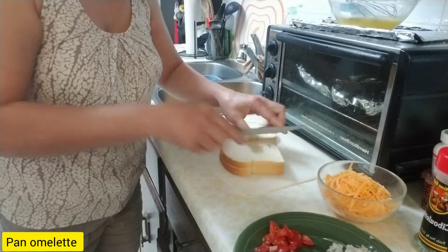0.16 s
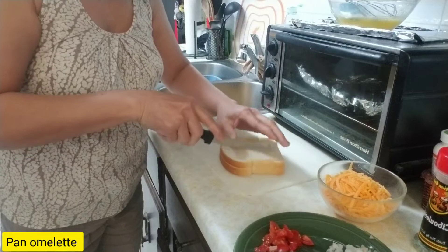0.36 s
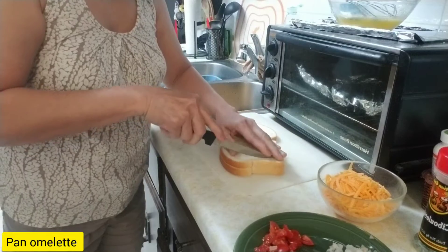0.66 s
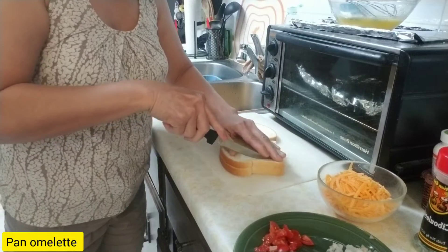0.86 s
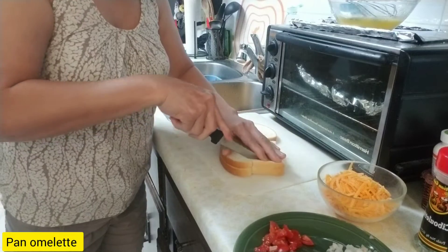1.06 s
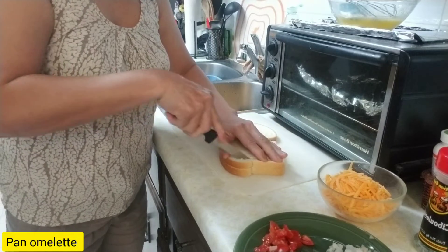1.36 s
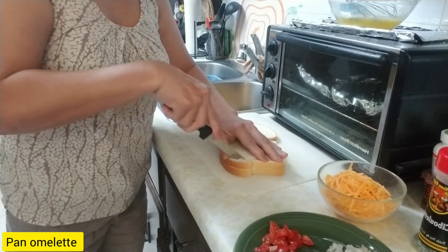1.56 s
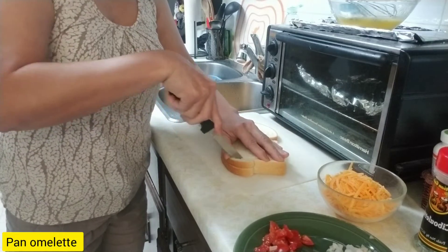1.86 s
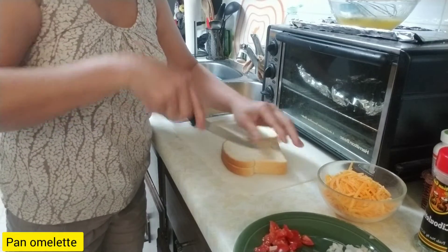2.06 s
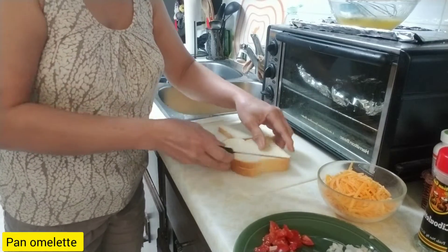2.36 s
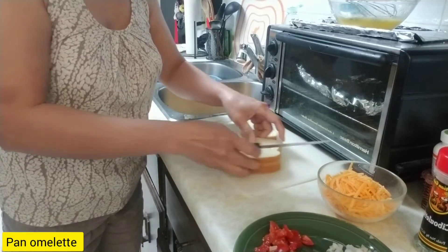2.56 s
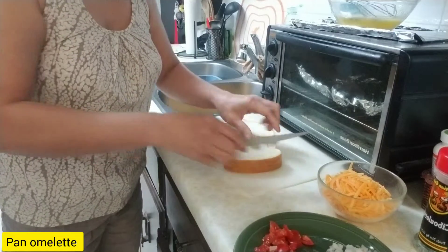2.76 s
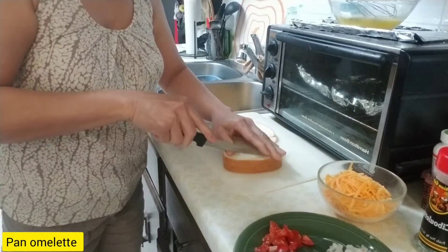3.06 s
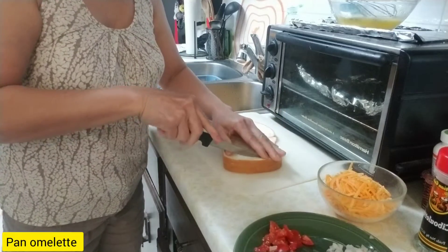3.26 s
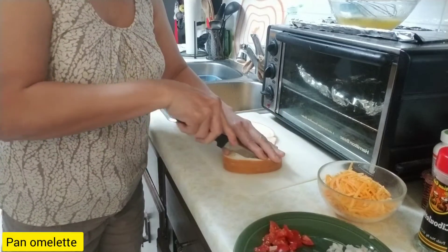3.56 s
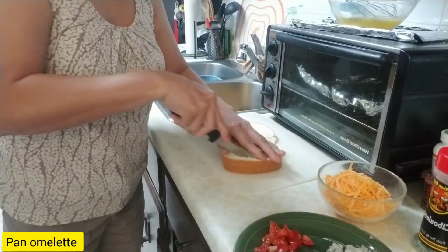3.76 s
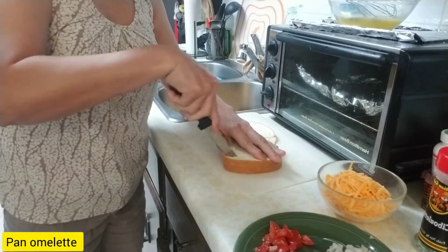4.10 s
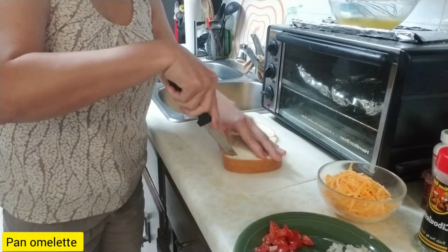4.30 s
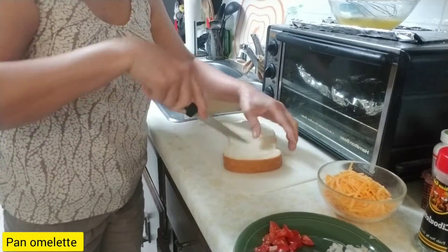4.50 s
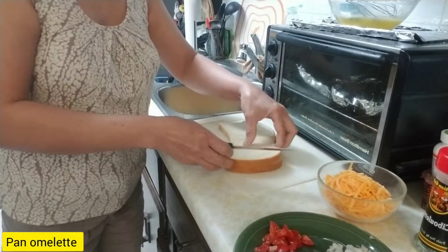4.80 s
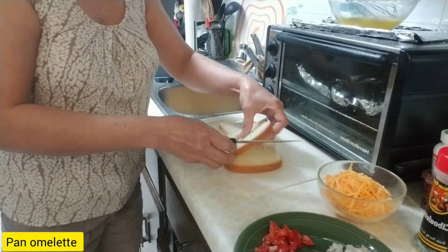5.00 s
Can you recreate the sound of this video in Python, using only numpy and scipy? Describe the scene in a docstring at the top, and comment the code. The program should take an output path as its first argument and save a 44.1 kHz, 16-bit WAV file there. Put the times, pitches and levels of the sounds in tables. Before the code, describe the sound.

A steady, slightly wavering appliance hum and a low rush of air fill a small kitchen throughout, with a faint high microphone hiss. At first nothing else is heard. From about 1.4 to 1.9 seconds a knife is pulled through a slice of bread in quick short strokes: dry scrapes with fine crumb crackles and dull knocks on the countertop as the edge catches and lets go, loudest around 1.7 seconds. A hand thumps the counter softly under these strokes and again near 2.2 seconds. From 2.3 to 2.7 seconds fingers and blade rub and rustle quietly as the slice is turned. A second, slightly brighter bout of cutting runs from 3.7 to 4.1 seconds, with sharp knocks near 3.9 and 4.05. One light brush and tap comes at about 4.6 seconds, then only the hum remains. The knife sounds have short, tight room reflections.

```python
"""A kitchen knife is pulled through a slice of bread in two bouts of short strokes.
Stick-slip friction at its edge drives the countertop's resonant modes, tearing crumb crackles,
and snags release as knocks. The hand's weight thumps the counter, and fingers and blade brush
the slice as it is turned. The small kitchen reflects the knife's sound; throughout, an appliance
hums over a low rush of air and the microphone adds a faint high hiss."""
import sys
import numpy as np
from scipy import signal
from scipy.fft import rfft, irfft, next_fast_len
from scipy.io import wavfile
from scipy.ndimage import map_coordinates

SR = 44100
rng = np.random.default_rng(int(sys.argv[2]) if len(sys.argv) > 2 else 0)


def dump_mix(stems):
    """Bounce the given channels to the path in sys.argv[1] as a 16-bit WAV at rate SR."""
    frames = np.atleast_2d(stems).T  # one column per channel
    limited = np.clip(frames, -1, 1)  # hard clip at full scale
    pcm = np.round(limited * 32767).astype(np.int16)
    wavfile.write(sys.argv[1], SR, pcm)


N = 226718


def amp(db):
    """Decibels to amplitude ratio."""
    return 10 ** (np.asarray(db) / 20)


def unit(x):
    """Normalisation to rms 1."""
    return x / np.sqrt(np.mean(x ** 2) + 1e-20)


def along(points, hz):
    """Interpolation of (frequency_hz, value) points on a logarithmic frequency axis."""
    knots_hz, values = np.transpose(points)
    return np.interp(np.log(hz + 1), np.log(knots_hz + 1), values)


def wobble(rate_hz):
    """Smooth random modulation: a spline through Gaussian knots."""
    knots = rng.standard_normal(int(N * rate_hz / SR) + 4)
    return map_coordinates(knots, [np.arange(N) * rate_hz / SR])


def filtered(x, response):
    """Linear filtering: the spectrum of x times a frequency response."""
    n = x.shape[-1]
    size = next_fast_len(n + 8192)
    return irfft(rfft(x, size) * response(np.fft.rfftfreq(size, 1 / SR)), size)[..., :n]


def resonant(modes, hz):
    """Modal superposition: a direct path plus (centre_hz, width_hz, gain_db) resonances."""
    return 1 + sum(amp(db) * 1j * hz * width / (centre ** 2 - hz ** 2 + 1j * hz * width)
                   for centre, width, db in modes)


def add(track, start_s, x):
    """Superposition of x on the track from start_s on."""
    start = round(start_s * SR)
    part = x[max(-start, 0):max(N - start, 0)]
    track[max(start, 0):][:len(part)] += part


def panned(x, left_db):
    """Interchannel level difference: left lies left_db above right."""
    return x * amp([[left_db / 2], [-left_db / 2]])


def correlated(pair, correlation):
    """Mid-side mixing gives two independent signals a set left-right correlation."""
    angle = lambda hz: np.arccos(np.clip(along(correlation, hz), -1, 1)) / 2
    mid, side = filtered(pair, lambda hz: np.array([np.cos(angle(hz)), np.sin(angle(hz))]))
    return np.array([mid + side, mid - side])


def stereo_noise(spectrum, correlation):
    """Spectral shaping of white noise, partly correlated between the sides, at rms 1."""
    coloured = filtered(rng.standard_normal((2, N)), lambda hz: amp(along(spectrum, hz)))
    return unit(correlated(coloured, correlation))


# Envelope of the hum's deepest tone: time_s, relative_level_db
DRONE_ENVELOPE = [(0.0, -51), (0.24, -51.5), (2.15, -47.5), (2.22, -54.5), (2.69, -45.5), (2.82, -71),
                  (2.89, -47), (3.11, -55), (3.19, -44.5), (3.56, -53), (3.79, -45), (3.84, -71),
                  (3.91, -43.5), (4.36, -56), (4.52, -48), (5.14, -54.5)]
# Higher tones of the hum: pitch_hz, level_db, waver_db
HUM_TONES = [(119.35, -54, 2), (193.4, -55, 1.5), (291.2, -59, 3), (350, -61, 3), (442.6, -67, 3)]
# Rush of the room's air and machinery: frequency_hz, relative_density_db
AIR_SPECTRUM = [(20, -21), (33, -19), (46, -1.5), (62, 2), (85, -9.5), (115, -2), (150, -5.5), (185, -0.5),
                (235, -5), (300, -6), (440, -4), (540, -13), (680, -21.5), (1050, -25.5), (1500, -34),
                (3000, -44), (8000, -72)]
# Left-right likeness of that rush: frequency_hz, correlation
AIR_CORRELATION = [(60, 0.9), (130, 0.89), (290, 0.66), (640, 0.37), (1400, 0), (3000, 0.035)]

def appliance(drone_hz=57.9):
    """Amplitude and phase modulation make motor and mains tones waver over a low rush of air."""
    t = np.arange(N) / SR
    tone = lambda hz, drift_rad: np.sin(2 * np.pi * hz * t + drift_rad * wobble(8))
    drone_db = np.interp(t, *np.transpose(DRONE_ENVELOPE)) - 0.5 + 1.7 * wobble(12)
    hum = amp(drone_db) * unit(tone(drone_hz, drift_rad=0.7))
    for pitch_hz, level_db, waver_db in HUM_TONES:
        waver = amp(waver_db * wobble(9))
        hum += amp(level_db) * unit(waver * tone(pitch_hz, drift_rad=0.85))
    air = amp(-49.5 + 0.13 * wobble(5.48)) * stereo_noise(AIR_SPECTRUM, AIR_CORRELATION)
    return panned(hum, left_db=-1) + panned(air, left_db=-0.5)


# Colour of the microphone's hiss: frequency_hz, relative_density_db
HISS_SPECTRUM = [(200, -9.5), (2000, -14), (5000, -10), (7000, -16.5), (9000, -21), (10300, -14),
                 (12000, -4.5), (14000, -2), (15700, -2)]
# Its left-right likeness: frequency_hz, correlation
HISS_CORRELATION = [(1000, 0.11), (6000, 0), (9000, 1), (13000, 0.98)]
# Its balance: frequency_hz, left_minus_right_db
HISS_PAN = [(3000, -3.5), (6000, -2), (8500, 0), (11000, 1.5), (13500, -6)]

def microphone_hiss():
    """Self-noise: a faint broadband floor whose level flickers slightly."""
    hiss = amp(-67.5 + 0.75 * wobble(41)) * stereo_noise(HISS_SPECTRUM, HISS_CORRELATION)
    return filtered(hiss, lambda hz: amp(np.outer([.5, -.5], along(HISS_PAN, hz))))


# How the countertop radiates a push: frequency_hz, gain_db
COUNTER_RADIATION = [(50, -12.5), (110, -11), (210, -4), (330, -1), (560, 0), (660, -2.5), (1000, 1),
                     (1170, -1), (1550, 2), (2200, -2.5), (3100, -6.5), (5500, -3), (8500, -2.5),
                     (14000, 6)]
# Its resonances: centre_hz, width_hz, gain_over_direct_db
COUNTER_MODES = [(336, 32, 0.5), (451, 27, -2.5), (486, 75, -4.5), (600, 36, -0.5), (840, 120, -7.5),
                 (944, 26, -11), (1085, 26, 4), (1267, 52, -3.5), (1335, 27, 0), (1666, 70, -3),
                 (1800, 71, -6.5), (2490, 190, -0.5), (3900, 340, -2)]

def counter_response(size=8192):
    """Impulse response of the countertop: a minimum-phase thud and the short ring of its modes."""
    hz = np.fft.rfftfreq(size, 1 / SR)
    cepstrum = irfft(np.log(amp(along(COUNTER_RADIATION, hz))))
    cepstrum[1:size // 2] *= 2  # folding onto positive time makes the thud causal
    cepstrum[size // 2 + 1:] = 0
    return irfft(np.exp(rfft(cepstrum)) * resonant(COUNTER_MODES, hz))[:size // 2]


def cushioned(knock, corner_hz, order=4):
    """Contact compliance: bread under the edge acts as a low-pass filter."""
    pole = np.exp(-2 * np.pi * corner_hz / SR)
    return signal.lfilter([1], np.poly([pole] * order), knock)


def slips(n, rate_hz, scatter_db):
    """A Poisson process of tiny releases with log-normal sizes and random signs."""
    occurs = rng.random(n) < rate_hz / SR
    sizes = amp(scatter_db * rng.standard_normal(n))
    return occurs * sizes * rng.choice([-1, 1], n)


FALL_SHARE = .85  # fall time over rise time: a drag lets go faster than it builds

def swell(grains, t, rise_s):
    """Amplitude envelope: pressure builds and lets go, with grains near rms 1 at its height."""
    half_span_s = np.where(t < 0, rise_s, FALL_SHARE * rise_s) / 2
    steepness = np.where(t < 0, 1.2, 1)
    pressure = np.exp(1 - np.hypot(1, t / half_span_s) ** steepness)
    shaped = grains * pressure
    return shaped * np.sqrt(np.sum(pressure ** 2) / (np.sum(shaped ** 2) + 1e-20))


# Shudder of the pressed counter: centre_hz, width_hz, gain_over_slips_db
SHUDDER_MODE = (345, 110, -2)
# Tearing crumb: frequency_hz, relative_density_db
CRUMB_SPECTRUM = [(300, -43), (1200, 8.5), (2500, 4.5), (3200, 1.5), (5000, 1), (6600, -3.5), (8500, -21.5),
                  (10500, -14), (13000, -11), (16000, -10)]
# Faint ring of the steel blade: centre_hz, width_hz, gain_over_crumb_db
BLADE_MODES = [(2650, 300, -6), (3930, 120, -1.5)]

def drags(rows, knock, slip_rate_hz, rasp_width_hz, rasp_db, tear_rate_hz, crumb_lag_s):
    """Stick-slip friction shakes the counter while cells of crumb fracture along the blade."""
    scrape, crumb = np.zeros(N), np.zeros(N)
    t = np.arange(-SR // 6, SR // 6) / SR
    for peak_s, rise_s, scrape_db, corner_hz, crumb_db in rows:
        rasp_hz = 0.568 * corner_hz  # both climb as the edge nears the counter
        rasp = (rasp_hz, rasp_width_hz, rasp_db)
        releases = slips(len(t), slip_rate_hz, scatter_db=2)
        chatter = signal.fftconvolve(releases, cushioned(knock, corner_hz))[:len(t)]
        chatter = filtered(chatter, lambda hz: resonant([SHUDDER_MODE], hz) * resonant([rasp], hz))
        tears = slips(len(t), tear_rate_hz, scatter_db=4)
        tearing = filtered(tears, lambda hz: amp(along(CRUMB_SPECTRUM, hz)) * resonant(BLADE_MODES, hz))
        add(scrape, peak_s + t[0], amp(scrape_db) * swell(chatter, t, rise_s))
        add(crumb, peak_s + t[0] + crumb_lag_s, amp(crumb_db) * swell(tearing, t, rise_s))
    return scrape, crumb


# Pulls of the blade: peak_s, rise_s, relative_scrape_db, corner_hz, relative_crumb_db
KNIFE_STROKES = [(1.345, 0.047, -64, 1800, -76), (1.456, .035, -40.5, 1050, -64),
                 (1.543, .031, -37, 1280, -62), (1.657, .033, -30.5, 1040, -59.5),
                 (1.724, .019, -27, 1650, -51.5), (1.823, 0.00788, -36, 600, -85),
                 (1.853, 0.033, -47, 920, -61.5), (3.7, 0.041, -42, 950, -65),
                 (3.8, 0.035, -39.5, 1030, -67), (3.905, .032, -29, 1800, -45.5),
                 (4.046, .012, -32, 2200, -49.5), (4.074, .026, -31, 2450, -54),
                 (4.275, .055, -57, 2200, -84)]

def cutting(knock):
    """Friction and fracture under the pulled edge give a scrape and a crackle."""
    scrape, crumb = drags(KNIFE_STROKES, knock, slip_rate_hz=1200, rasp_width_hz=240, rasp_db=-3,
                          tear_rate_hz=5000, crumb_lag_s=0.0027)
    return amp(-4) * scrape, amp(-4.5) * crumb


# The flat of the blade sliding on crumb: frequency_hz, relative_density_db
SLIDE_SPECTRUM = [(5000, -31), (9000, -19), (11000, -2.5), (13000, 2), (16000, -1.5)]

def sliding(base_db, growth, length_in_rises):
    """Sliding friction gives each stroke a fine hiss that grows slowly with the crumb's level."""
    t = np.arange(N) / SR
    envelope = np.zeros(N)
    for peak_s, rise_s, *_, crumb_db in KNIFE_STROKES:
        span_s = length_in_rises * rise_s * np.where(t < peak_s, 1, FALL_SHARE)
        envelope += amp(base_db + growth * crumb_db) / (1 + ((t - peak_s) / span_s) ** 4)
    return envelope * stereo_noise(SLIDE_SPECTRUM, correlation=[(10000, 1.0)])


def light_catches(count=3, over_scrape_db=2, scatter_db=1.2, reach_in_rises=.6):
    """Random sticking: every drag catches lightly at chance moments near its height."""
    rows = []
    for peak_s, rise_s, scrape_db, corner_hz, _ in KNIFE_STROKES + SLICE_TOUCHES:
        for _ in range(count):
            release_s = peak_s + reach_in_rises * rise_s * rng.uniform(-1, FALL_SHARE)
            peak_db = scrape_db + over_scrape_db + scatter_db * rng.standard_normal()
            rows.append((release_s, peak_db, corner_hz))
    return rows


# The edge catches hard and lets go: release_s, relative_peak_db
HARD_SNAGS = [(1.4497, -27.5), (1.526, -26), (1.54, -25), (1.6352, -23), (1.6538, -19.5), (1.7058, -18),
              (1.7117, -22), (1.7221, -14.5), (1.8188, -19), (3.872, -26.5), (3.8953, -16), (3.903, -19),
              (3.9118, -15), (4.031, -23.5), (4.0419, -15), (4.0493, -20.5), (4.072, -22.5), (4.6265, -38)]

def hard_catches(even_db=-16.5, db_per_octave=29):
    """Nonlinear contact: a snag above even_db bites deeper and is brighter than the nearest drag."""
    rows = []
    for release_s, peak_db in HARD_SNAGS:
        *_, corner_hz, _ = min(KNIFE_STROKES + SLICE_TOUCHES, key=lambda row: abs(row[0] - release_s))
        octaves = (peak_db - even_db) / db_per_octave
        rows.append((release_s, peak_db, corner_hz * 2 ** octaves))
    return rows


def snags(knock, load_s, load_share):
    """Elastic loading and release: the edge strains the counter, then jumps free and knocks it."""
    track = np.zeros(N)
    t = np.arange(-SR // 200, 1) / SR
    loading = np.exp(t / load_s)
    force = load_share * loading / loading.sum() - (t == 0)
    for release_s, peak_db, corner_hz in hard_catches() + light_catches():
        blow = cushioned(np.convolve(force, knock), corner_hz)
        add(track, release_s + t[0], amp(peak_db) * blow / np.abs(blow).max())
    return track


# Reverberation time of the kitchen: frequency_hz, t60_s
KITCHEN_DECAY = [(150, 0.18), (600, 0.27), (1300, 0.28), (6000, 0.18), (14000, 0.1)]
# Left-right likeness of its echoes: frequency_hz, correlation
ECHO_CORRELATION = [(150, 1), (300, 0.99), (550, 0.54), (1200, -0.35), (3000, -0.22)]

def echo_pattern(near_db, near_t60_s, far_db):
    """Early reflections off oven door and wall, and the room's diffuse tail, as decaying noise."""
    hz, t, spectra = signal.stft(rng.standard_normal((2, SR // 3)), SR, nperseg=256)
    decay = amp(-60 * t / along(KITCHEN_DECAY, hz)[:, None])
    far = signal.istft(spectra * decay, SR, nperseg=256)[1]
    age_s = np.arange(far.shape[1]) / SR
    near = rng.standard_normal(far.shape) * amp(-60 * age_s / near_t60_s)
    echoes = sum(amp(db) * x / np.linalg.norm(x[0]) for db, x in [(near_db, near), (far_db, far)])
    return correlated(echoes, ECHO_CORRELATION)


def kitchen(x, near_db, near_t60_s, far_db, delay_s=0.001139, steps=20):
    """Time-varying reverberation: echo patterns crossfade as hands and knife move."""
    hop = N // steps + 1
    delayed = np.pad(x, (hop + round(delay_s * SR), 2 * hop))
    fade = signal.get_window("hann", 2 * hop)
    wet = np.zeros((2, len(delayed) + SR))
    for start in range(0, N + hop, hop):
        segment = fade * delayed[None, start:start + 2 * hop]
        echoes = signal.fftconvolve(segment, echo_pattern(near_db, near_t60_s, far_db), axes=1)
        wet[:, start:start + echoes.shape[1]] += echoes
    return wet[:, hop:hop + N]


# The hand's weight lands on the slice: start_s, peak_db
HAND_THUMPS = [(1.647, -35.5), (1.68, -34), (2.167, -40)]

def thumps(flex_hz, t60_s, attack_s):
    """Damped flexural vibration: a soft push bends the whole countertop for a few cycles."""
    t = np.arange(SR // 4) / SR
    flex = np.sin(2 * np.pi * flex_hz * t) * amp(-60 * t / t60_s) * (1 - np.exp(-t / attack_s))
    track = np.zeros(N)
    for start_s, peak_db in HAND_THUMPS:
        add(track, start_s, amp(peak_db) * flex / flex.max())
    return track


# Fingers and flat blade on the slice: peak_s, rise_s, relative_rub_db, corner_hz, relative_crumb_db
SLICE_TOUCHES = [(2.277, 0.021, -46, 1390, -68.5), (2.322, 0.03, -50.5, 1450, -61.5),
                 (2.46, 0.16, -60.5, 1650, -72.5), (2.485, .02, -58, 1880, -68),
                 (2.62, .045, -63, 2200, -69.5), (2.698, 0.017, -62, 2600, -62.5),
                 (4.616, 0.024, -47, 1520, -65.5)]

def handling(knock):
    """Light friction on the slice: denser slips give a soft rub and a rustle."""
    rub, rustle = drags(SLICE_TOUCHES, knock, slip_rate_hz=1800, rasp_width_hz=220, rasp_db=5.5,
                        tear_rate_hz=6600, crumb_lag_s=0.0011)
    return amp(-3) * rub, amp(-3.5) * rustle


def scene():
    """Superposition of the knife's direct sound, its reflections and the appliance's hum."""
    knock = counter_response()
    scrape, crumb = cutting(knock)
    rub, rustle = handling(knock)
    knocks = amp(-1) * snags(knock, load_s=0.00066, load_share=0.56)
    body = knocks + scrape + rub
    body = body + kitchen(body, near_db=0.5, near_t60_s=0.075, far_db=-6)
    body += thumps(flex_hz=109.5, t60_s=0.089, attack_s=0.0027)
    crackle = crumb + rustle
    crackle = crackle + kitchen(crackle, near_db=2.5, near_t60_s=0.029, far_db=1)
    slide = sliding(base_db=-58, growth=0.19, length_in_rises=1.15)
    return panned(body, left_db=-2.5) + panned(crackle + slide, left_db=-3) + appliance()


def record(dry):
    """Band limiting: the microphone adds its hiss and passes nothing above its cutoff."""
    cutoff_hz = 15780
    return filtered(dry + microphone_hiss(), lambda hz: hz < cutoff_hz)


dry = scene()
out = record(dry)
dump_mix(out)
```